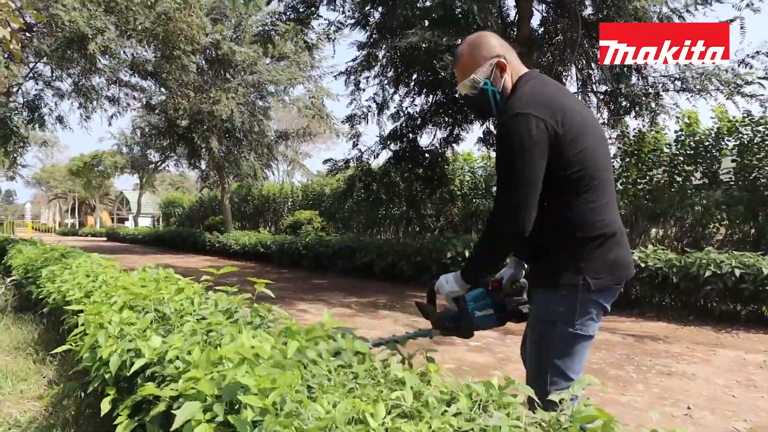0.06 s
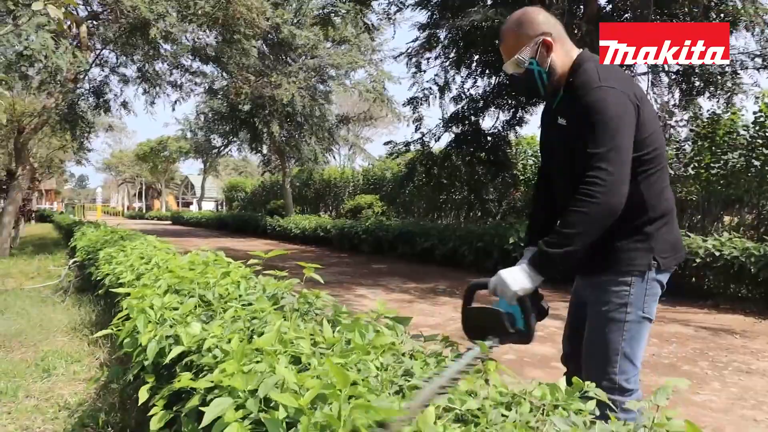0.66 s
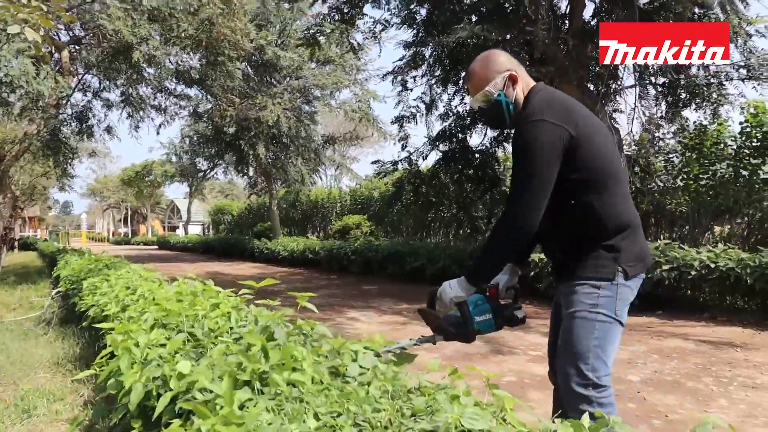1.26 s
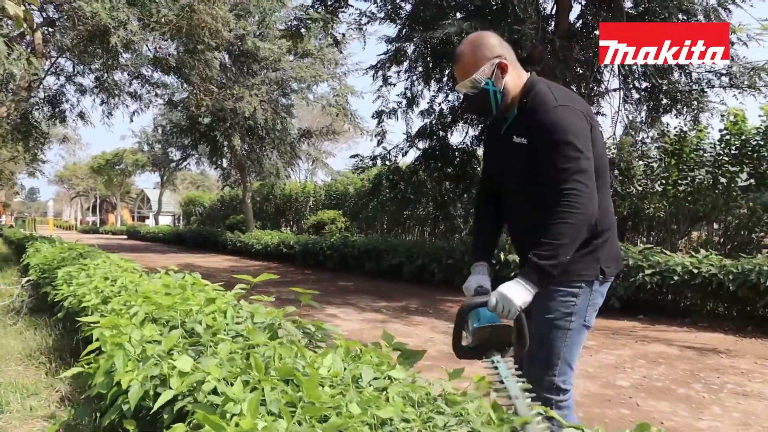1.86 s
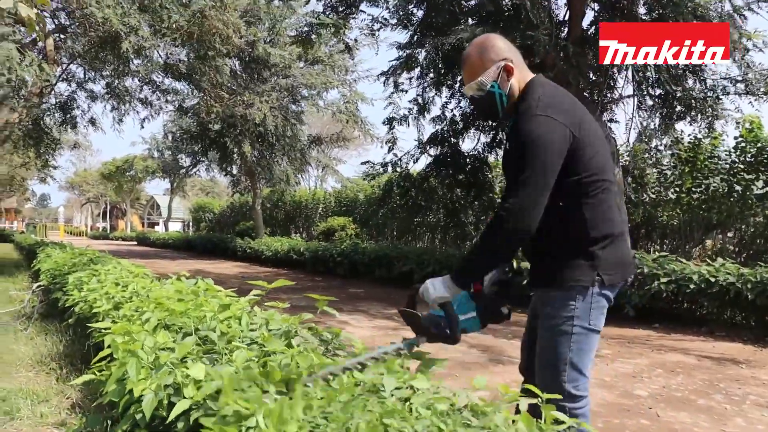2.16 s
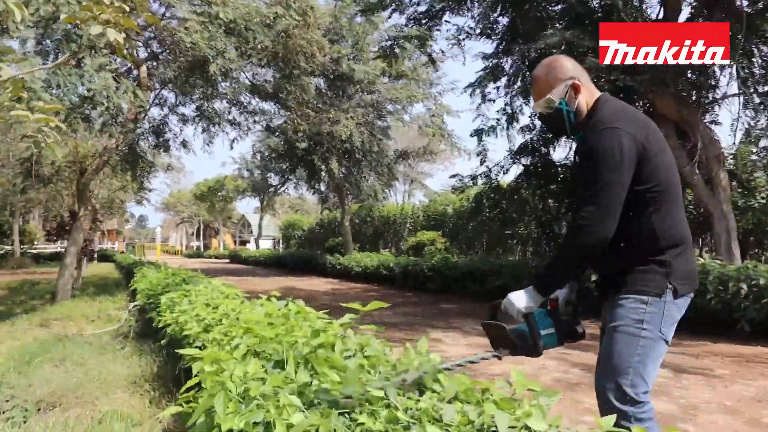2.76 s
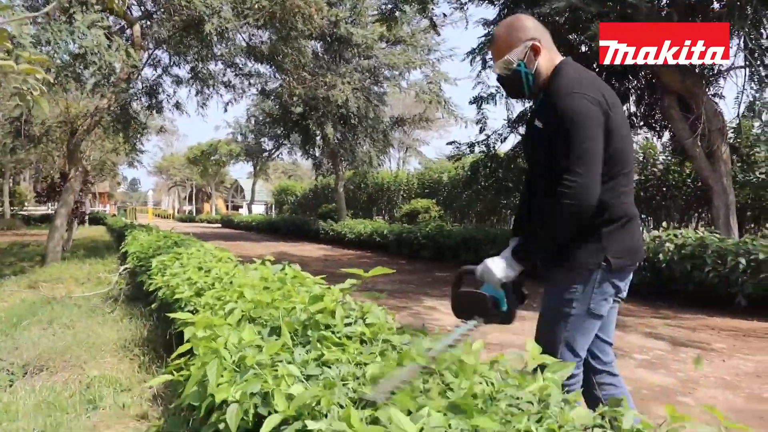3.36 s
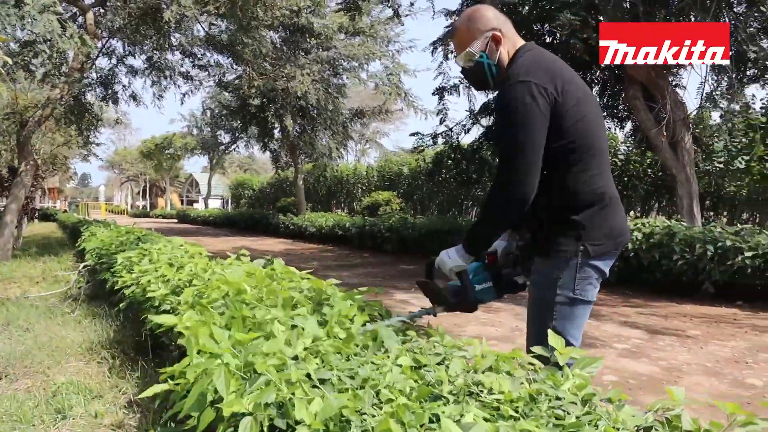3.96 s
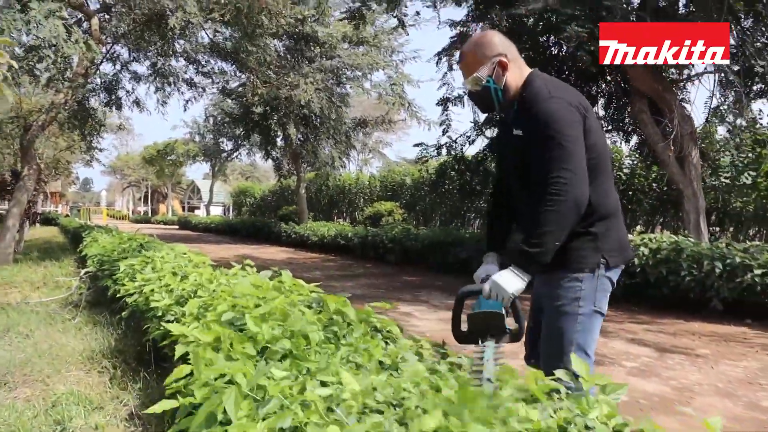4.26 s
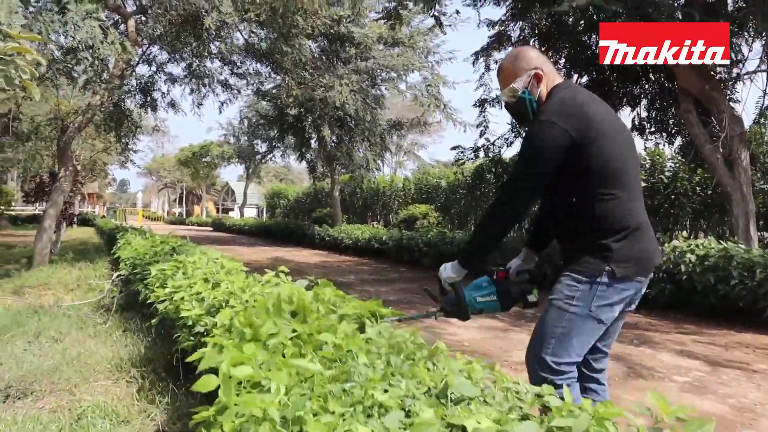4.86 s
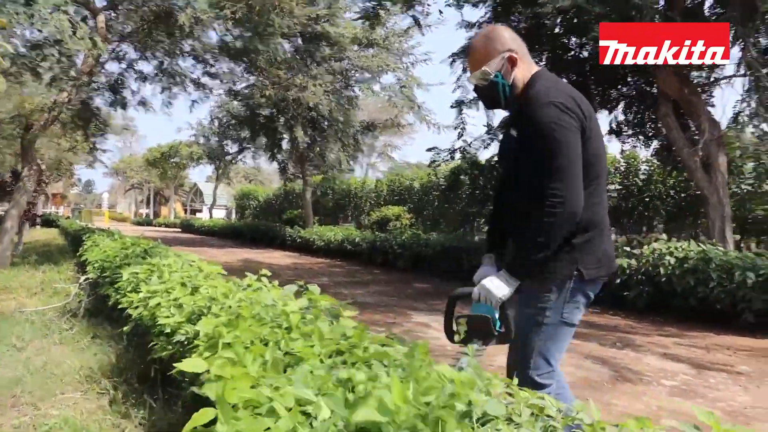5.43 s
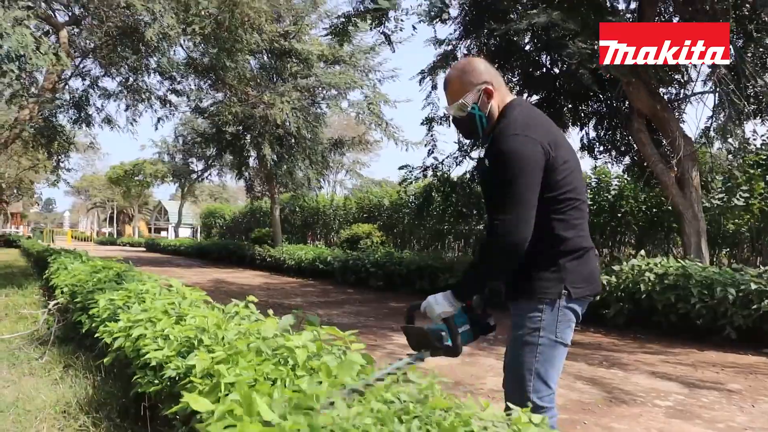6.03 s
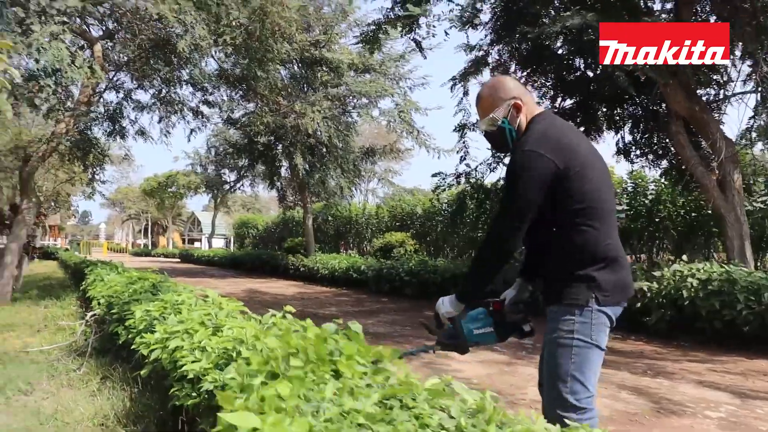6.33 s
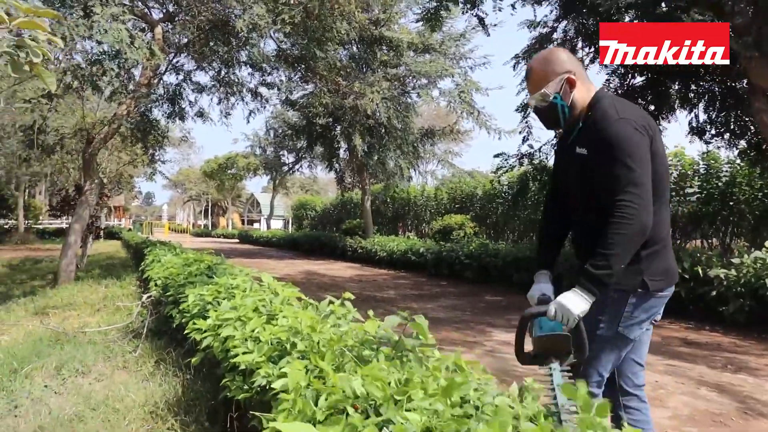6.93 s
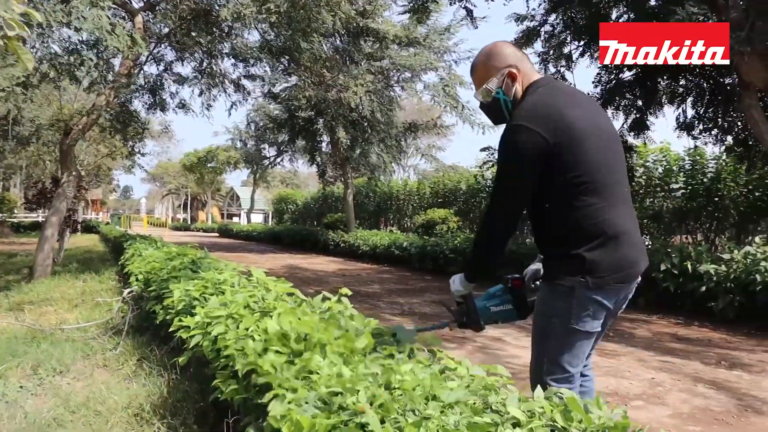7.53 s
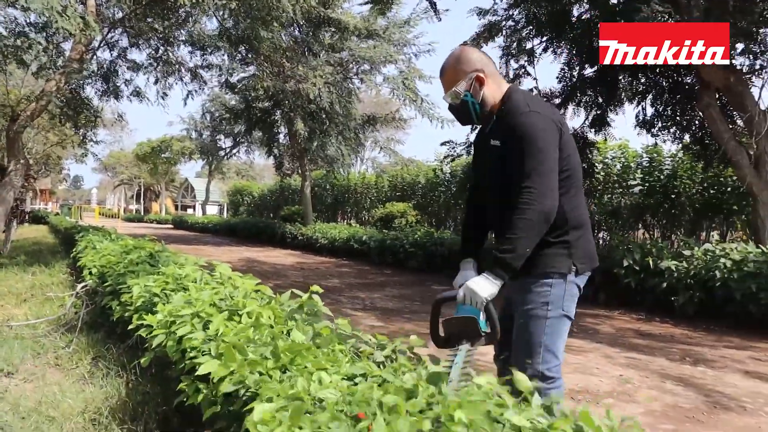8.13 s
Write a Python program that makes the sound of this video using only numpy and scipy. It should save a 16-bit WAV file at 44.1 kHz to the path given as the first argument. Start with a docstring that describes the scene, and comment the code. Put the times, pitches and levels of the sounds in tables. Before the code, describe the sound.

Fast, rasping blades of an electric hedge trimmer sweep back and forth through a leafy hedge outdoors, over gusts of wind rumble.

```python
"""A harsh, fast clatter swells and recedes: an electric hedge trimmer, flat out, swung over a low hedge.
Its blades knock at each end of their stroke and rasp in between, over a rushing fan and a droning
housing. Leaves crunch and twigs snap in the teeth; now and then a narrow note swells in the clatter.
The garden path returns a moving echo, and wind buffets the microphone."""
import sys
import numpy as np
from scipy import signal
from scipy.fft import rfft, irfft
from scipy.io import wavfile
from scipy.ndimage import uniform_filter1d, minimum_filter1d, map_coordinates

SR = 44100
rng = np.random.default_rng(int(sys.argv[2]) if len(sys.argv) > 2 else 0)


def materialize(psi):
    """Save the field psi as 16-bit PCM at rate SR to the path in sys.argv[1].

    A 1-D psi becomes a single channel; in a 2-D psi each row is a channel.
    """
    bounded = np.clip(np.atleast_2d(psi).T, -1, 1)
    quanta = np.round(bounded * 32767).astype(np.int16)
    wavfile.write(sys.argv[1], SR, quanta)


N = 361179
TIME = np.arange(N) / SR

# spectrum of cracking wood: f/Hz, level/dB
STEM_COLOUR = [(600, -23), (1500, -4), (3000, -3.5), (4000, 6), (5600, 1), (7200, 2.5), (9000, -14),
               (16000, -7)]


def from_db(db):
    """Decibels to gain."""
    return 10 ** (np.asarray(db) / 20)


def rms_one(x):
    """Scale to unit rms."""
    return x / np.sqrt(np.mean(x ** 2) + 1e-20)


def glide(points):
    """An automation curve: straight lines through (time, value) points."""
    return np.interp(TIME, *np.transpose(points))


def drift(rate):
    """A smooth random wander through `rate` points a second; rms 1."""
    knots = rng.standard_normal(4096)
    return rms_one(map_coordinates(knots, [TIME * rate], order=3, mode="wrap"))


def swell(s, half_length):
    """A bell-shaped rise and fall around time s."""
    distance = (TIME - s) / half_length
    return np.exp(-.5 * distance ** 2) * (np.abs(distance) < 5)


def grains(per_s):
    """Tiny contacts at random moments with random sizes; rms 1."""
    return rms_one((rng.random(N) < per_s / SR) * rng.standard_normal(N))


def coloured(x, colour):
    """Minimum-phase EQ in the shape of `colour`; keeps the power of white noise."""
    hz, db = np.transpose(colour)
    grid = np.linspace(1, SR / 2, 4097)
    gain = rms_one(from_db(np.interp(np.log(grid), np.log(hz), db)))
    cepstrum = irfft(np.log(gain))
    cepstrum[1:len(grid) - 1] *= 2
    cepstrum[len(grid):] = 0
    impulse = irfft(np.exp(rfft(cepstrum)))
    return signal.fftconvolve(x, impulse)[:N]


def resonance(x, hz, width):
    """One mode, with gain 1 at its centre, which may move."""
    pole = np.exp(-np.pi * width / SR)
    cycles = np.cumsum(hz * np.ones(N) / SR)
    angle = (2 * np.pi * (cycles % 1)).astype(np.float32)
    carriers = np.cos(angle), np.sin(angle)
    return sum(2 * wave * signal.lfilter([1 - pole], [1, -pole], x * wave) for wave in carriers)


def per_stroke(strokes, start, rise, decay, spread_db, jitter):
    """One burst per stroke, each with its own strength and moment (times in strokes); rms 1."""
    chance = rng.standard_normal((1024, 2))
    power = 0
    for back in range(3):  # earlier bursts are still dying away
        k = np.floor(strokes - start + .5).astype(int) - back
        age = np.maximum(strokes - start - k - jitter * chance[k, 0], 0)
        attack = 1 - np.exp(-(age / rise) ** 2)
        power += (from_db(spread_db * chance[k, 1]) * attack * np.exp(-age / decay)) ** 2
    return rms_one(np.sqrt(power))


def swing(linger=1.483):
    """The arms ease to and fro, lingering on the listener's side; returns how the blades face."""
    # ends of the swings: t/s, facing (0 aside, 1 at the listener)
    turns = [(0, 0.046), (0.659, 1.34), (1.191, 0.062), (1.96, 1.13), (2.68, 0.22), (3.24, 1.01),
             (3.86, 0.28), (4.47, 0.84), (5.12, -0.00097), (5.82, 1.08), (6.53, 0.047), (7.16, 0.89),
             (7.76, -0.082), (8.22, 0.92)]
    times = [s for s, _ in turns]
    leg = np.interp(TIME, times, np.arange(len(times)))
    arc = 1 - np.abs(np.cos(np.pi * leg / 2)) ** (2 * linger)
    aside, towards = glide(turns[::2]), glide(turns[1::2])
    return aside + (towards - aside) * arc


def foliage():
    """Load on the teeth from soft leaves and from woody stems: each bite swells and fades."""
    # bites into the hedge: t/s, level/dB, half length/s, woody share
    bites = [(0.222, 0, 0.056, .35), (1.375, 0.72, 0.0802, 0.1), (2.3, 0, 0.091, 0.3),
             (2.64, -8, 0.054, .2), (2.842, -3.5, 0.06, .3), (3.632, 2, 0.035, 0.5),
             (4.06, -2.5, 0.061, 0.17), (4.808, -4, 0.043, 0), (5.383, -2.5, 0.065, 0.5),
             (6.24, -5.5, 0.066, 0), (6.839, -8, 0.081, 0.3), (7.5, -1.5, 0.046, 0.36),
             (7.962, 1, 0.036, 0.29)]
    power = np.array([(from_db(db) * swell(s, half_length)) ** 2 for s, db, half_length, _ in bites])
    woody = np.array(bites)[:, 3]
    return np.sqrt((1 - woody) @ power), np.sqrt(woody @ power)


def crank(facing, load, free_per_s=71.7, sag_per_s=1.2, wander=0.0031, reach_m=1.135):
    """Count of strokes as heard: the motor sags under load, and the swing adds a slight Doppler shift."""
    speed = (free_per_s - sag_per_s * load) * (1 + wander * drift(20))
    early_s = reach_m * facing / 343
    return np.cumsum(speed) / SR + free_per_s * early_s


def cutter_bar(x, shift):
    """The steel bar adds its resonances to whatever shakes it."""
    # bar modes: f/Hz, width/Hz, level/dB
    modes = [(2570, 350, -8), (3780, 430, 0.5), (5500, 180, -3.5), (9720, 110, -4)]
    return x + sum(from_db(db) * resonance(x, hz * shift, width) for hz, width, db in modes)


def knocks(strokes, push, shift):
    """At each reversal the blades take up their play and rattle on the bar; pushed, they scrape more."""
    # spectrum of the clatter: f/Hz, level/dB
    colour = [(600, -24), (1100, -4.5), (1600, -6), (2100, -1.5), (3000, 2.5), (4500, -1), (6500, 2.5),
              (9700, 0), (12000, -1), (13300, -7), (15500, -6.5)]
    bursts = per_stroke(strokes, start=0, rise=0.076, decay=0.31, spread_db=2.5, jitter=0.011)
    scrape_share = np.clip(0.055 + 0.27 * push, 0, 1)
    contact = np.sqrt((1 - scrape_share) * bursts ** 2 + scrape_share)
    rattle = coloured(contact * grains(per_s=11000), colour)
    return from_db(0.1 * push) * rms_one(cutter_bar(rattle, shift))


def rasp(strokes):
    """Gears and sliding blades grind hardest in mid-stroke."""
    # spectrum of the grinding: f/Hz, level/dB
    colour = [(400, -34.5), (750, -6), (950, -2), (1300, -2), (1700, -10), (2400, -0.5), (3200, -5.5),
              (6000, -20.5), (12000, -37)]
    bursts = per_stroke(strokes, start=0.428, rise=0.068, decay=0.33, spread_db=-0.14, jitter=0.019)
    return rms_one(coloured(bursts * grains(per_s=5000), colour))


def cooling_air(shift, flutter_db=1.5):
    """The fan's rush and the steady hiss of steel on steel."""
    # spectrum of rush and hiss: f/Hz, level/dB
    colour = [(60, -17), (200, -16), (380, -5.5), (550, -15), (800, -8), (1200, 2.5), (2000, -1),
              (3200, -2.5), (4000, -0.5), (5800, -0.5), (8000, -4), (11000, -3), (13500, -10), (16000, -20)]
    rush = rng.standard_normal(N) * from_db(flutter_db * drift(60))
    return rms_one(cutter_bar(coloured(rush, colour), shift))


def drone(strokes, hum_db=-6, waver_db=1.0):
    """The housing booms with each stroke; the rotor hums at seven turns per reversal."""
    # spectrum of the boom: f/Hz, level/dB
    colour = [(250, -17.5), (400, -23.5), (455, -4.5), (505, -0.5), (570, 2), (660, -1), (780, -7.5),
              (1100, -24.5)]
    bursts = per_stroke(strokes, start=0.52, rise=0.15, decay=0.78, spread_db=0.5, jitter=0.023)
    boom = rms_one(coloured(bursts * rng.standard_normal(N), colour))
    rotor_turns = 7 * strokes + 0.03 * drift(30)
    hum = rms_one(np.sin(2 * np.pi * rotor_turns) * from_db(waver_db * drift(20)))
    return rms_one(boom + from_db(hum_db) * hum)


def nasal_peaks(strokes, facing, swing_db=-10, sink=0.08):
    """A nasal colour pulses with each stroke; it fades and sinks as the blades face the listener."""
    # peaks of the nasal colour: f/Hz, width/Hz, level/dB
    peaks = [(1284, 150, 9), (1770, 210, -10.5), (2560, 170, -11)]
    # its strength with the blades aside: t/s, level/dB
    levels = [(0, -48), (3.8, -37), (5.0, -30), (8.19, -29.5)]
    bursts = per_stroke(strokes, start=0.46, rise=0.13, decay=0.34, spread_db=-2.0, jitter=0.037)
    grit = bursts * grains(per_s=5000)
    nasal = sum(from_db(db) * resonance(grit, hz * (1 - sink * facing), width) for hz, width, db in peaks)
    return from_db(glide(levels) + swing_db * facing) * rms_one(nasal)


def leaves(strokes, soft, woody, brush_db=-12):
    """The closing teeth crunch leaves, hard in a bite and lightly in between; stems crack brighter."""
    # spectrum of shredding leaves: f/Hz, level/dB
    colour = [(600, -22.5), (1500, -7), (3000, -7.5), (3600, 2.5), (4080, 8), (4700, 2.5), (5500, 5),
              (6200, -1.5), (8000, -14), (12000, -12.5), (15500, -10)]
    bursts = per_stroke(strokes, start=0.044, rise=0.053, decay=0.57, spread_db=2.0, jitter=0.04)
    crunch = np.hypot(soft, from_db(brush_db)) * coloured(bursts * grains(per_s=4000), colour)
    return crunch + woody * coloured(bursts * grains(per_s=3300), STEM_COLOUR)


def twigs(decay_s=.008, trim_db=-3, top_cut_db=6):
    """A twig breaks in a short crackle of fibres, with less top than the crunch of stems."""
    # snaps between the teeth: t/s, relative level/dB
    snaps = [(0.458, -8), (0.998, -6), (1.013, -7), (1.085, -8), (2.3632, -4), (2.4903, -3), (3.803, -6),
             (4.975, -5.5), (6.309, -4.5), (6.324, -6), (6.7669, -7), (7.6745, 4)]
    envelope = np.zeros(N)
    for s, db in snaps:
        at = int(s * SR)
        envelope[at:] += from_db(db + trim_db) * np.exp(-np.minimum(TIME[:N - at] / decay_s, 20))
    duller = [(hz, db - top_cut_db * (hz > 10000)) for hz, db in STEM_COLOUR]
    return coloured(envelope * grains(per_s=13000), duller)


def wind(lump_db=3.0, eddy_hz=110, eddy_db=1.0, eddy_growth=2.02):
    """Lumpy rumble on the microphone port; higher-pitched eddies grow faster than the flow."""
    # steady breeze: t/s, relative level/dB
    breeze = [(0, -52), (.95, -34.5), (1.3, -29.5), (2.7, -30.5), (3.4, -29), (4.45, -31.5), (5.3, -18.5),
              (6.05, -24), (6.6, -20.5), (7.2, -26.5), (7.9, -25), (8.19, -44)]
    # gusts on top of it: t/s, relative level/dB, half length/s
    gusts = [(0.464, -26, 0.017), (1.21, -15, 0.021), (1.443, -23, 0.018), (1.612, -15, 0.02),
             (1.693, -17, 0.046), (1.807, -19, 0.016), (2.064, -22, 0.017), (2.216, -16.5, 0.013),
             (2.268, -17, 0.015), (2.33, -23, 0.018), (2.488, -19, 0.011), (2.602, -26, 0.015),
             (2.669, -12.5, 0.019), (2.85, -21, 0.022), (3.118, -21, 0.021), (3.204, -21.5, 0.018),
             (3.578, -4, 0.011), (3.682, -13, 0.036), (3.78, -5, 0.014), (4.144, -23, 0.021),
             (4.703, -15.5, 0.016), (4.808, -16, 0.017), (5.16, -15.5, 0.045), (5.327, -11.5, 0.037),
             (5.447, -9.5, 0.041), (5.611, -7, 0.024), (5.701, -13, 0.019), (5.932, -21, .018),
             (6.26, -19, 0.018), (6.364, -18, .025), (6.514, -17, 0.021), (6.649, -16, 0.018),
             (6.815, -16.5, 0.013), (6.964, -14, 0.034), (7.426, -4.5, 0.016), (7.556, -9.5, 0.011),
             (7.656, -16.5, 0.021), (7.803, -18, 0.018), (7.93, -17.5, 0.015)]
    # spectrum of the buffeting: f/Hz, level/dB
    colour = [(12, -9.5), (28, 1.5), (60, 2), (110, -8), (180, -20), (260, -37), (500, -43.5), (1500, -59)]
    lumpy = from_db(glide(breeze) + lump_db * drift(18))
    gust_power = sum((from_db(db) * swell(s, half_length)) ** 2 for s, db, half_length in gusts)
    flow = np.sqrt(lumpy ** 2 + gust_power)
    rumble, eddies = (coloured(white, colour) for white in rng.standard_normal((2, N)))
    eddies = rms_one(signal.sosfilt(signal.butter(2, eddy_hz, "high", fs=SR, output="sos"), eddies))
    return from_db(-3.5) * flow * rms_one(rumble) + from_db(eddy_db) * flow ** eddy_growth * eddies


def brief_peaks(strokes, width_hz=90):
    """Now and then a narrow ringing note swells briefly in the clatter."""
    # narrow notes: t/s, level/dB, half length/s, f/Hz
    notes = [(0.9, -31, 0.055, 2420), (1.166, -29, .12, 1830), (1.191, -27, 0.061, 2330),
             (4.553, -31, 0.11, 2344)]
    bursts = per_stroke(strokes, start=0, rise=0.032, decay=0.43, spread_db=-3, jitter=0.018)
    grit = bursts * grains(per_s=5000)
    return sum(from_db(db) * swell(s, half_length) * rms_one(resonance(grit, hz, width_hz))
               for s, db, half_length, hz in notes)


def looseness():
    """Gain for the spells in which the blades run looser and louder, or quieter."""
    # spells: t/s, level change/dB, half length/s
    spells = [(.39, -2.5, 0.031), (0.871, 1, .04), (1.152, -1, 0.04), (3.324, -2, 0.026), (3.52, 1.5, .04),
              (4.433, 1.5, 0.039), (4.615, -2.5, .025), (6.354, -1.5, 0.022), (7.41, 2, 0.04)]
    return from_db(sum(db * swell(s, half_length) for s, db, half_length in spells))


def beaming(x, facing, treble_hz=7200, lobe_width_hz=750):
    """The treble beams along the blades with a bright lobe; both fade as they turn aside."""
    # centre of the lobe: t/s, f/Hz
    centre = [(0.6, 9520), (1.85, 9300), (2.15, 8540), (3.3, 8400), (4.5, 8300), (5.8, 9200), (6.5, 8706),
              (7.3, 8320)]
    treble = signal.sosfiltfilt(signal.butter(2, treble_hz, "high", fs=SR, output="sos"), x)
    lobe = resonance(x, glide(centre), lobe_width_hz)
    treble_db, lobe_db = -3 + 2 * facing, -2 + 4.5 * facing
    return x + (from_db(treble_db) - 1) * treble + (from_db(lobe_db) - 1) * lobe


def outdoors(x, facing, ground_db=-9, ground_cut_hz=2200, stretch=.035):
    """The dull echo from the path combs the sound as the tool moves; weak, shifting scatter follows."""
    # echo from the path, following the tool's height: t/s, lag/s
    ground_lag = [(0, .00205), (.85, .00207), (1.15, .00166), (1.33, .00163), (1.7, .002), (2.3, .00205),
                  (2.6, .00172), (2.85, .00173), (3.1, .002), (3.6, .00198), (4.1, .00185), (4.6, .00203),
                  (4.85, .0017), (5.25, .00166), (5.45, .002), (6.15, .00208), (6.33, .00174), (6.7, .0017),
                  (6.88, .002), (7.4, .00203), (7.6, .00172), (7.85, .00174), (8.1, .00203)]
    # echoes from hedge, operator and trees with the blades aside: lag/s, level/dB
    echoes = [(.0053, -38), (.0117, -28.5), (0.0208, -15.5), (0.036, -18.5), (.061, -14)]
    dull = signal.sosfiltfilt(signal.butter(1, ground_cut_hz, fs=SR, output="sos"), x)
    ground = from_db(ground_db) * np.interp(TIME - glide(ground_lag), TIME, dull)
    lengthen = 1 + stretch * facing
    scatter = sum(from_db(db) * np.interp(TIME - lag * lengthen, TIME, x, left=0) for lag, db in echoes)
    return x + ground + scatter


def scene():
    """One crank sets the rhythm of the tool; the swing sets how much of each sound is heard."""
    facing = swing()
    push = rms_one(np.gradient(facing))  # positive on the forward swing
    soft, woody = foliage()
    strokes = crank(facing, load=np.hypot(soft, woody))
    bar_shift = 1 + 0.0069 * push + .01 * drift(7)  # the bar's modes rise with the push and wander
    clatter = from_db(-23.5 + 8 * facing) * knocks(strokes, push, bar_shift) + brief_peaks(strokes)
    gears = from_db(-28 + 1.7 * facing) * rasp(strokes)
    air = from_db(-19.5 - 0.7 * facing) * cooling_air(bar_shift)
    housing = from_db(-33.5 + 4 * facing + 0.15 * push) * drone(strokes)
    tool = looseness() * (clatter + air) + gears + housing + nasal_peaks(strokes, facing)
    cutting = from_db(-12.5) * leaves(strokes, soft, woody) + twigs()
    return (outdoors(beaming(tool, facing) + cutting, facing) + wind())[None]


def record(dry, ceiling=.70, window_samples=14, cutoff_hz=15800):
    """A fast limiter holds the peaks down; the top is cut before and after it."""
    lowpass = signal.ellip(12, .05, 60, cutoff_hz, fs=SR, output="sos")
    x = signal.sosfiltfilt(lowpass, dry)
    needed = ceiling / np.maximum(np.abs(x), ceiling)
    gain = uniform_filter1d(minimum_filter1d(needed, window_samples), window_samples)
    return signal.sosfiltfilt(lowpass, gain * x)


dry = scene()
out = record(dry)
materialize(out)
```